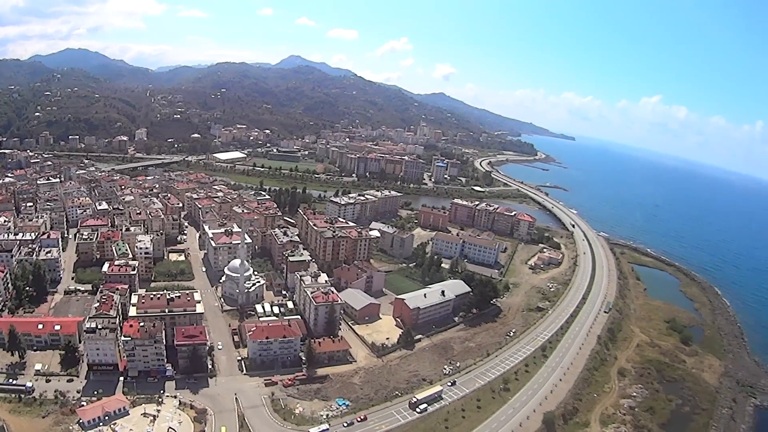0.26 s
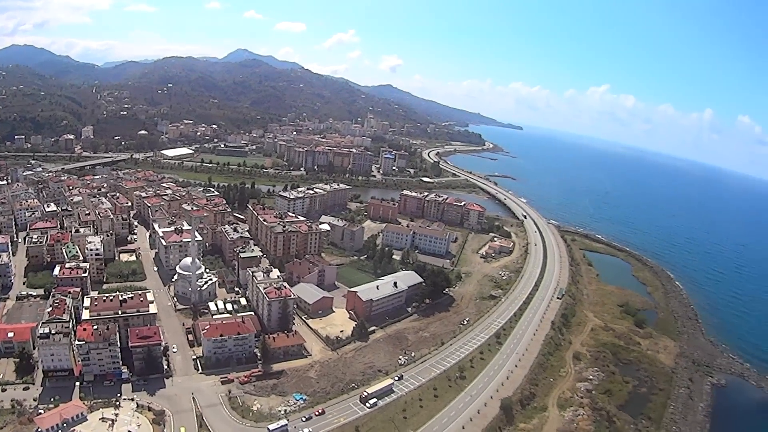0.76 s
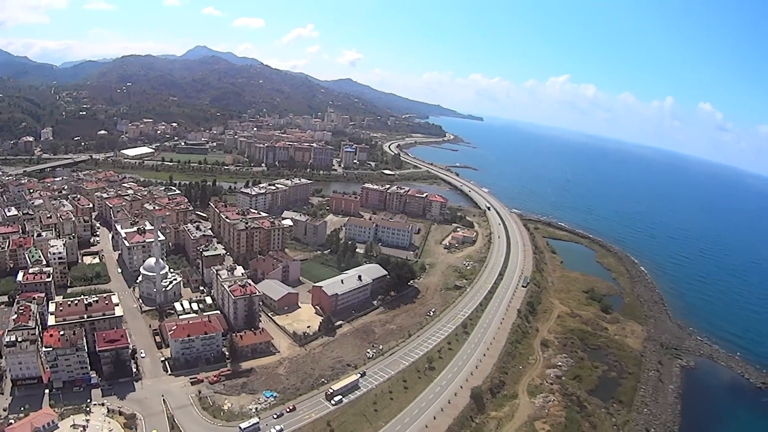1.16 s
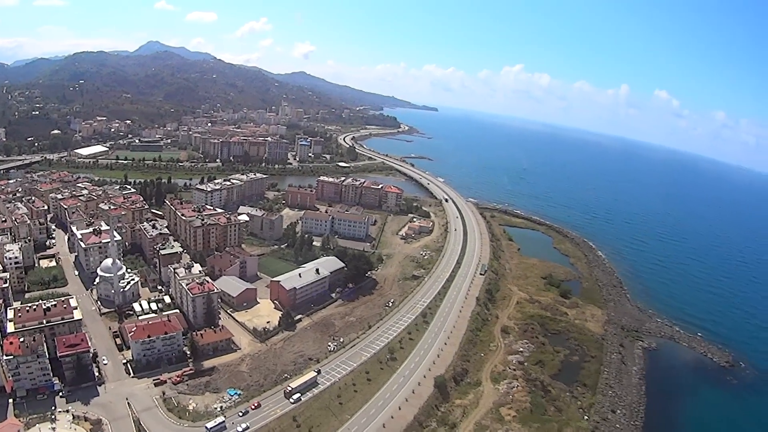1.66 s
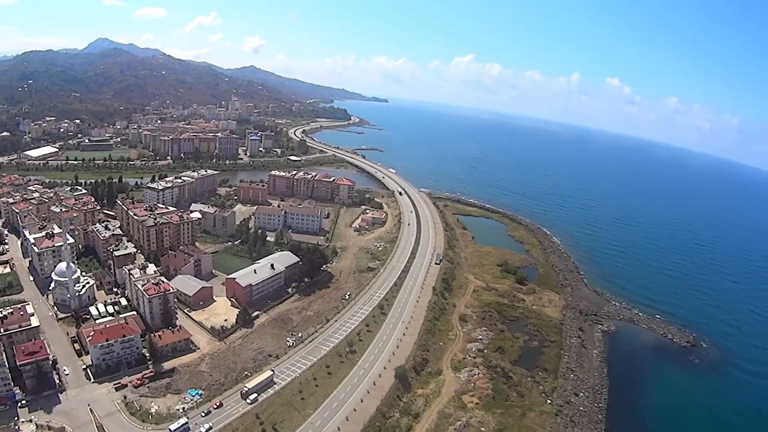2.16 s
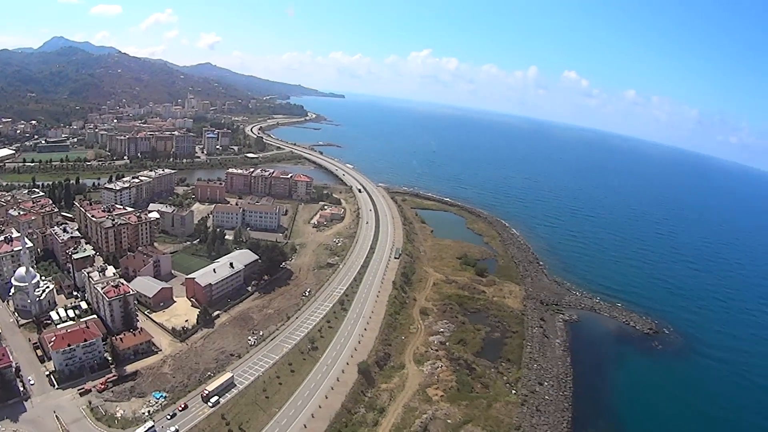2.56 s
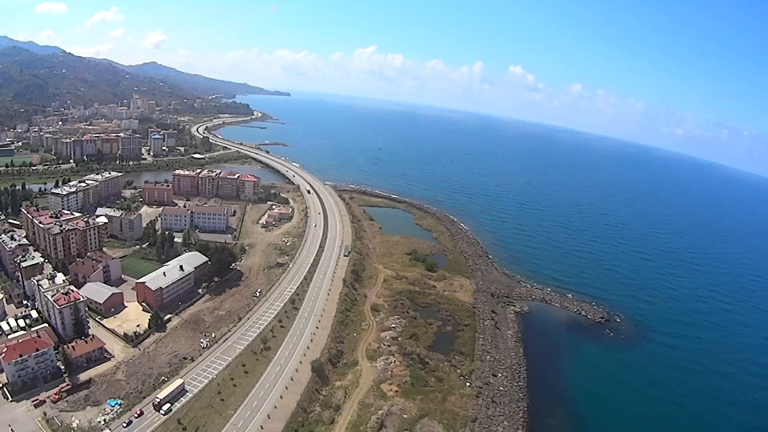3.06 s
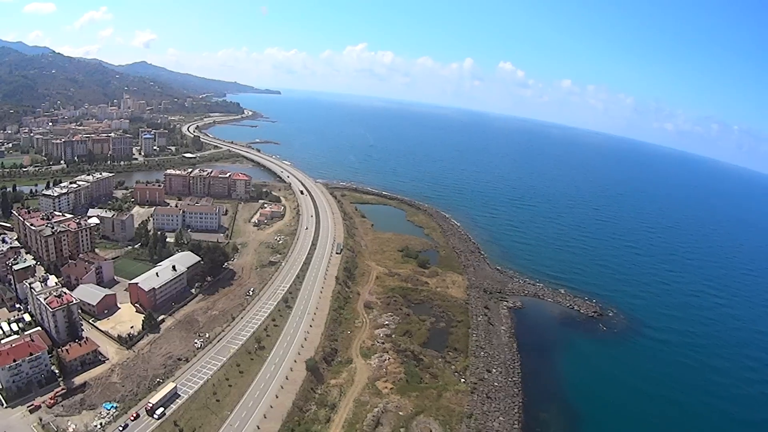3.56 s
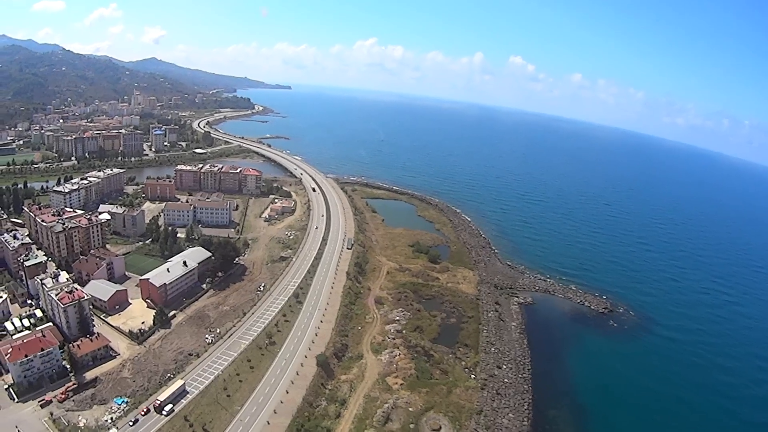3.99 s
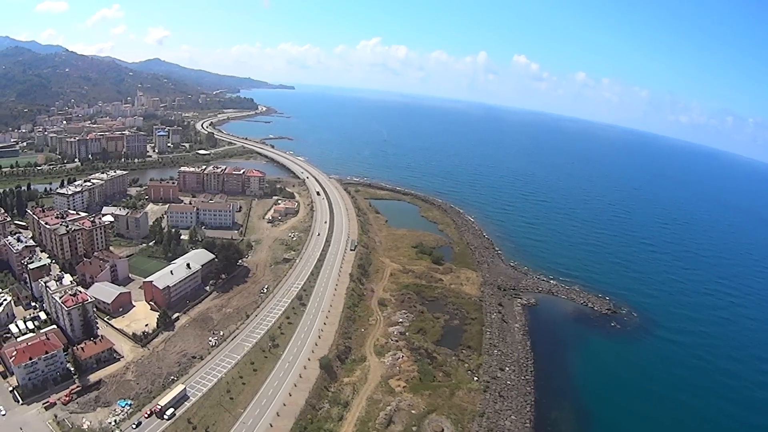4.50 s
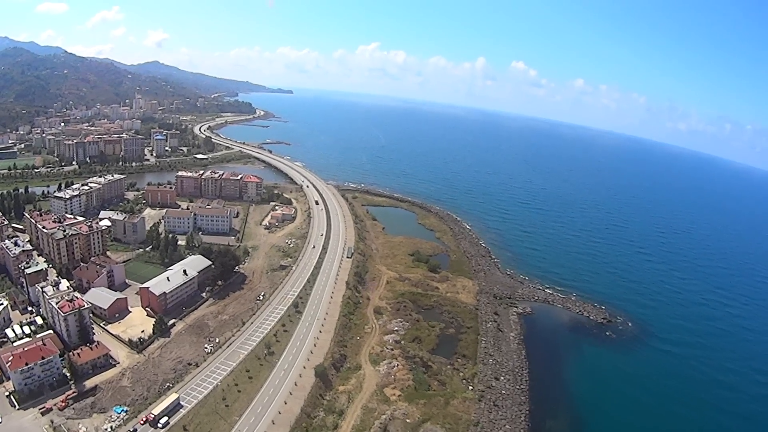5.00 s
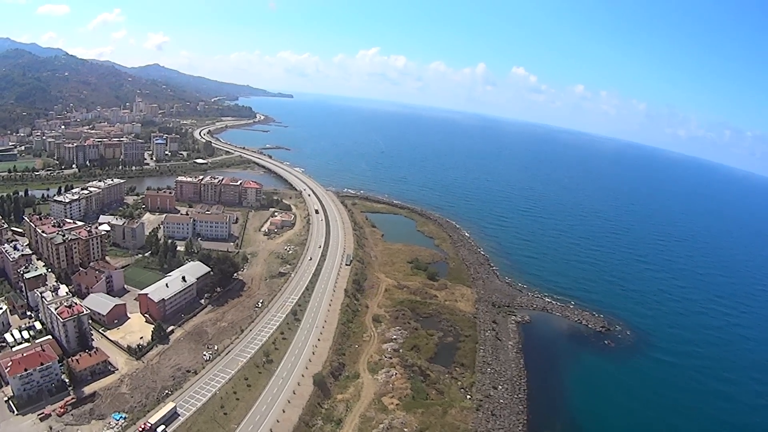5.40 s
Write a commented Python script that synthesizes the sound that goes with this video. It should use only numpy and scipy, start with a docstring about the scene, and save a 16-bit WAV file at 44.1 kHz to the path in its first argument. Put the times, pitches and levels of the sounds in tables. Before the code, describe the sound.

A drone in flight is heard outdoors from its own microphone. From the start, the nearest propeller makes a low, throbbing buzz, and its downwash strikes the microphone in rough, fluttering puffs with small dry crackles. Low wind rumbles swell at about 0.7 and 1.3 seconds. From 2.5 seconds the pitch sags, and between 2.8 and 3.5 seconds the wind falls away, bringing forward the other rotors' chord-like hum, blade hiss and a thin, high motor whine. At 3.5 seconds the wind thumps back in, duller than before, with two brief high motor whistles. The throb grows stronger and climbs clearly in pitch until about 5.1 seconds, dotted with sharp spits of air. It then eases down a little as the whir comes forward again, with another short whistle around 5.5 seconds.

```python
"""Drone banking, heard from its camera

The nearest rotor throbs; its downwash hits the two microphone ports in puffs, once or twice a turn.
When the wash swings clear, the other rotors' chord, blade hiss and motor-drive whine come forward."""
import sys
import numpy as np
from scipy import signal
from scipy.fft import rfft, irfft
from scipy.io import wavfile
from scipy.ndimage import uniform_filter1d

SR = 44100
rng = np.random.default_rng(int(sys.argv[2]) if len(sys.argv) > 2 else 0)


def transcribe(signal):
    """Save signal, clipped to [-1, 1], as a 16-bit WAV file at the path in sys.argv[1]."""
    frames = np.atleast_2d(signal).T
    limited = np.clip(frames, -1, 1)
    pcm = np.round(limited * 32767).astype(np.int16)
    wavfile.write(sys.argv[1], SR, pcm)


N = 248723
TIME = np.arange(N) / SR
FREQS = np.maximum(np.fft.rfftfreq(N, 1 / SR), 1)

# Downwash lies on the ports, swings clear, returns duller:
# time_s, level_db (300-900 Hz), bright_db (2-4 kHz re level)
WASH = [(0, -18.5, -10), (.4, -18.5, -13.5), (1.0, -18.5, -13.5), (1.45, -17, -14), (1.83, -18.5, -9.5),
        (2.52, -21.5, -13.5), (2.72, -30.5, -24), (2.85, -48, -23), (3.46, -45, -10), (3.58, -21, -21),
        (3.9, -21.8, -16.5), (4.1, -26.5, -27), (4.7, -25.5, -32.5), (5.12, -19, -18.5),
        (5.4, -23.5, -17.5), (5.64, -22, -15.5)]
# Other rotors: blade_hz, blade_db, octave_db (both before whir gain), share of near rotor's speed change
OTHER_ROTORS = [(221, -40, -46, -.15), (237.5, -35, -43, -.03), (247.3, -32, -40.5, .25),
                (264, -33, -46, -.08)]


def undb(db):
    """Decibels to gain."""
    return 10 ** (np.asarray(db) / 20)


def curves(table):
    """Columns of a time table, per sample."""
    time_s, *columns = np.transpose(table)
    return [np.interp(TIME, time_s, c) for c in columns]


def over_frequency(table):
    """Columns of a frequency table, per bin."""
    hz, *columns = np.transpose(table)
    return [np.interp(np.log(FREQS), np.log(hz), c) for c in columns]


def walk(rate_hz):
    """Random steps, smoothed twice; unit spread."""
    hold = max(int(SR / rate_hz), 2)
    steps = np.repeat(rng.standard_normal(N // hold + 2), hold)
    steps = steps[rng.integers(hold):][:N]
    smooth = uniform_filter1d(uniform_filter1d(steps, hold), hold)
    return smooth / smooth.std()


def port_noise(colour, ports):
    """Spectra of partly coherent noise at the left and right port."""
    coherence, lead_rad = over_frequency(ports)
    shared, own = rfft(rng.standard_normal((2, N)))
    right = coherence * shared * np.exp(-1j * lead_rad) + np.sqrt(1 - coherence ** 2) * own
    return np.array([shared, right]) * undb(over_frequency(colour)[0])


def tone(phase, rms_db, lead_rad=0):
    """Stereo sinusoid, left port leading."""
    return np.sqrt(2) * undb(rms_db) * np.cos(phase + np.array([[lead_rad], [-lead_rad]]) / 2)


def turning(hz):
    """Rate to phase in radians."""
    return 2 * np.pi * np.cumsum(hz) / SR


def near_rotor(angle, shaft_db, blade_db, usual_throb_db=-18):
    """Pressure waves of two unequal blades sweeping past; stronger waves are more lopsided."""
    wash_db, _ = curves(WASH)
    throb_db = 20 * np.log10(np.hypot(undb(shaft_db), undb(blade_db)))
    third_db = -29.5 + 1.38 * (throb_db - usual_throb_db)
    shake_db = 1.15 * np.clip(undb(wash_db - throb_db), .35, 2)  # the wash shakes the throb
    shaft = tone(angle, shaft_db + shake_db * walk(25), lead_rad=.77)
    blade = tone(2 * angle + np.pi / 2, blade_db + shake_db * walk(25), lead_rad=.64)
    third = tone(3 * angle, third_db + shake_db * walk(25), lead_rad=2.43)
    return shaft + blade + third


def downwash(angle, blade_share, usual_bright_db=-12):
    """Turbulence on the ports, pulsed by the blades; stronger puffs are brighter."""
    # Wash spectrum: freq_hz, relative_db
    colour = [(22, -20), (40, -19), (65, -7), (100, -2), (170, 1.5), (350, 2), (600, -1), (1000, -6),
              (1700, -12), (2500, -17.5), (3700, -24), (5000, -30), (7000, -41), (11000, -56)]
    # Wash between the ports: freq_hz, coherence, left_lead_rad
    ports = [(60, 1, 0.17), (160, 0.68, 1.2), (288, 0.21, 1.15), (392, 0.45, 2.66), (587, 0.63, 3.01),
             (1990, 0.72, 3.55), (4100, 0.61, 4.53), (8000, 0.9, 5.56)]
    wash_db, bright_db = curves(WASH)
    bright_db = bright_db + walk(18)  # rougher and smoother by turns
    air = port_noise(colour, ports)
    air /= irfft(air * ((FREQS > 300) & (FREQS < 900)), N).std()
    passes = np.cos(angle) * (1 - .5 * blade_share) + blade_share * np.cos(2 * angle)
    body_db, crack_db = slaps()
    puffing = 3 * passes + 2 * walk(520) + .68 * walk(55)  # blades, eddies, gusts
    puffing /= 1 + abs(crack_db) / 2  # a slap sweeps small eddies aside
    crackle = 2 * walk(1800)  # smallest eddies
    crackle += 4 * np.clip(walk(1300) - 1.6, 0, 1.3)  # a few spit much harder
    out = 0
    for hz in 2. ** np.arange(5, 15):
        octave = np.maximum(1 - abs(np.log2(FREQS / hz)), 0)
        treble = np.interp(np.log2(hz), np.log2([520, 1006, 2150, 4096]), [0, .15, .68, 1.3])
        depth = np.interp(np.log2(hz), np.log2([130, 900, 4100, 8200]), [.34, 1.07, 1.14, 1.23])
        puffs = undb(depth * (puffing + treble * crackle))
        puffs /= np.sqrt(np.mean(puffs ** 2))
        slap_db = body_db + min(treble, 1) * (crack_db - body_db)
        gain_db = wash_db + treble * (bright_db - usual_bright_db) + slap_db
        out += undb(gain_db) * puffs * irfft(air * octave, N)
    return out


def slaps(body_s=.003, crack_s=.002):
    """Brief dB boosts of the wash as single large eddies hit: low body, treble crack."""
    # Hardest puffs: centre_s, body_db, crack_db
    hits = [(.089, 2, 6), (.115, 1, 5), (0.805, 2, 10), (1.556, 3, 6), (1.733, 9.5, 4.5), (1.87, 4.5, 2),
            (2.289, 2.5, 11), (2.306, 6, 11.5), (2.556, 11, 13), (2.725, 12, 15), (3.509, 22.5, 6),
            (3.682, 9.5, 16), (3.73, 11.5, 13), (3.885, 5, 13.5), (3.947, 4.5, 17), (4.194, 8.5, 23.5),
            (4.396, 5.5, 20), (4.56, 10, 17.5), (4.903, 9, 24.5), (5.359, 8, 10)]
    body_db = sum(db * np.exp(-((TIME - s) / body_s) ** 2) for s, db, _ in hits)
    crack_db = sum(db * np.exp(-((TIME - s) / crack_s) ** 2) for s, _, db in hits)
    return body_db, crack_db


def buffets(centre_hz=65, width_oct=.81):
    """Large eddies rumble unevenly on the two ports."""
    # Wind buffets: centre_s, half_length_s, rms_db, left_minus_right_db
    eddies = [(0.723, 0.11, -29, 4), (1.276, 0.23, -26, -1), (3.61, 0.099, -27.5, 10)]
    band = np.exp(-(np.log2(FREQS / centre_hz) / width_oct) ** 2 / 2)
    rumble = irfft(rfft(rng.standard_normal(N)) * band, N)
    swells = 0
    for centre_s, half_s, rms_db, pan_db in eddies:
        port_gain = undb(rms_db + np.array([[pan_db], [-pan_db]]) / 2)
        swells += port_gain * np.exp(-((TIME - centre_s) / half_s) ** 2)
    return swells * rumble / rumble.std()


def other_rotors(blade_angles, chop=.1, hiss_db=-32.5, overtone_db=-51):
    """Each rotor hums at its own speed and chops the hiss of its blade tips."""
    # Hiss spectrum: freq_hz, relative_db
    colour = [(22, -16), (45, -0.5), (90, 6), (170, 0), (320, -9), (600, -8.5), (1000, -7.5), (1700, -8),
              (2500, -12.5), (3700, -18.5), (4800, -15), (6200, -20), (7500, -21), (8600, -17.5),
              (11000, -26)]
    # Hiss between the ports: freq_hz, coherence, left_lead_rad
    ports = [(60, .93, -0.1), (250, 0.6, 0.7), (500, 0.45, 2.5), (1300, 0.57, 1.56), (3000, 0.71, 1.1),
             (5000, 0.26, 0.9), (10000, 0.78, -5.4)]
    hum, swish = 0, 1
    for phase, (_, blade_db, octave_db, _) in zip(blade_angles, OTHER_ROTORS):
        hum += tone(phase, blade_db + walk(13), lead_rad=1.18)
        hum += tone(2 * phase, octave_db + walk(5.6), lead_rad=1.65)
        for k in range(3, 9):
            hum += tone(k * phase, overtone_db - .5 * k + 3 * walk(12), lead_rad=1.94)
        swish += chop * np.cos(phase)
    hiss = irfft(port_noise(colour, ports), N)
    return hum + hiss / hiss.std() * swish * undb(hiss_db + .82 * walk(15))


def near_overtones(angle, first_db=-45, fall_db=4):
    """Airborne hum of the nearest rotor: blade harmonics 2-4."""
    return sum(tone(2 * k * angle, first_db - fall_db * (k - 2) + 2 * walk(12), lead_rad=2)
               for k in (2, 3, 4))


def motor_drives(shaft_angles, switch_hz=8060, beat_hz=18, poles=14):
    """Thin switching whine, with sidebands from each turn and from the passing magnets."""
    # Magnetic whine before whir gain: torque_ripple_db, lower_sideband_db, upper_sideband_db
    magnet_db = (-65, -64, -71)
    carrier = turning(switch_hz + 2.72 * walk(25))
    whine = tone(carrier, -52 + 3.6 * walk(18), lead_rad=1)
    slow_carrier = carrier - turning(beat_hz + 4 * walk(25))  # a second drive's clock
    whine += tone(slow_carrier, -56 + 2.7 * walk(22))
    for k in (1, 2):
        whine += tone(carrier + k * shaft_angles[0], -65 + 2.1 * walk(15))
    for angle in shaft_angles:
        pole = poles * angle
        phases = (3 * pole, carrier - pole, carrier + pole)  # three windings pull at each pole
        for phase, db in zip(phases, magnet_db):
            whine += tone(phase, db + 3 * walk(13))
    return whine


def singing_motor(fade_s=.029, waver_hz=16):
    """Short, rough whistles of a motor's magnetic poles crossing a frame resonance."""
    # One track per whistle: time_s, pitch_hz, level_db
    whistles = [
        [(3.51, 5040, -54), (3.56, 5190, -45), (3.6, 5260, -60)],
        [(3.64, 4800, -60), (3.75, 4670, -43.5), (3.82, 4600, -58)],
        [(4.5, 4800, -62), (4.8, 4910, -69), (5.2, 4850, -66)],
        [(5.44, 4470, -70), (5.55, 4450, -47), (5.64, 4460, -51)],
    ]
    out = 0
    for track in whistles:
        pitch_hz, level_db = curves(track)
        inside_s = np.minimum(TIME - track[0][0], track[-1][0] - TIME)
        gate = np.clip(inside_s / fade_s + 1, 0, 1)
        phase = turning(pitch_hz + waver_hz * walk(200))
        out += gate * tone(phase, level_db + 1.8 * walk(40), lead_rad=1)
    return out


def sputter(rate_hz=7, band_hz=(1200, 7000)):
    """Random dry spits of air on each port, scaled by the treble of the wash."""
    wash_db, bright_db = curves(WASH)
    hits = rng.random((2, N)) < rate_hz / SR
    size_db = 9 + 4 * np.minimum(rng.exponential(size=(2, N)), 3)
    band = signal.butter(1, band_hz, "bandpass", fs=SR, output="sos")
    return signal.sosfilt(band, hits * undb(wash_db + bright_db + size_db))


def scene(hover_hz=103, wander=.00399):
    """Rotor throb and wash at the ports, over the whir of the craft."""
    # Nearest rotor eases off in the bank, speeds up to level out: time_s, shaft_hz
    speed = [(0, 108.9), (.85, 110.1), (1.6, 113), (2.5, 110), (2.68, 106), (3.4, 101.9), (3.7, 118.6),
             (3.85, 124), (4.1, 128.6), (4.5, 132.1), (5.12, 133.4), (5.64, 123.6)]
    # Its throb at the camera: time_s, shaft_db (once a turn), blade_db (twice a turn)
    throb = [(0, -28, -20), (.2, -22, -15.5), (1.1, -25, -21), (1.75, -19, -29.5), (2.4, -23, -40.5),
             (2.75, -30, -38), (3.0, -33, -42), (3.55, -28, -32.5), (3.7, -18, -33), (4.2, -14, -35),
             (4.88, -16, -30.5), (5.28, -31.5, -28), (5.64, -25.5, -24.5)]
    # Airborne whir, swelling as the throb lets up: time_s, gain_db
    whir_gain = [(0, -13.5), (1.2, -9), (2.25, -21), (2.62, -5.5), (3.55, 3.5), (3.75, -2), (3.86, -14),
                 (4.5, -10), (4.95, -10.5), (5.55, -1)]
    shaft_hz, = curves(speed)
    shaft_db, blade_db = curves(throb)
    whir_db, = curves(whir_gain)
    speed_change = shaft_hz / hover_hz - 1  # the others follow or oppose it to hold the bank
    blade_angles = [turning(hz * (1 + share * speed_change + wander * walk(4)))
                    for hz, _, _, share in OTHER_ROTORS]
    shaft_angle = turning(shaft_hz)
    whine = motor_drives([shaft_angle] + [a / 2 for a in blade_angles])
    whir = other_rotors(blade_angles) + near_overtones(shaft_angle) + whine
    wake_angle = shaft_angle + .032 * walk(40)  # the wake arrives slightly early or late
    blade_share = undb(blade_db) / (undb(blade_db) + undb(shaft_db))  # how evenly the two blades hit
    wake = near_rotor(wake_angle, shaft_db, blade_db) + downwash(wake_angle, blade_share) + buffets()
    return wake + whir * undb(whir_db) + singing_motor() + sputter()


def record(dry):
    """The camera clips just under full scale and cuts the top."""
    top_hz = 11050
    lowpass = signal.ellip(12, .1, 80, top_hz, fs=SR, output="sos")
    return signal.sosfilt(lowpass, np.clip(dry, -.9, .9))


dry = scene()
out = record(dry)
transcribe(out)
```